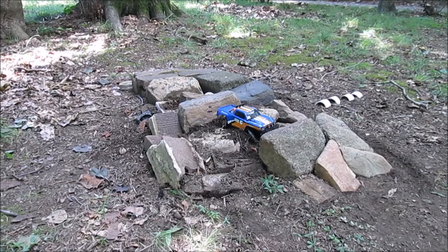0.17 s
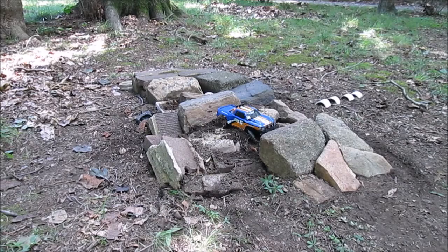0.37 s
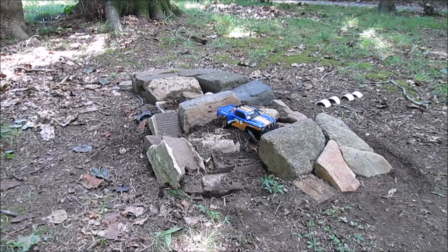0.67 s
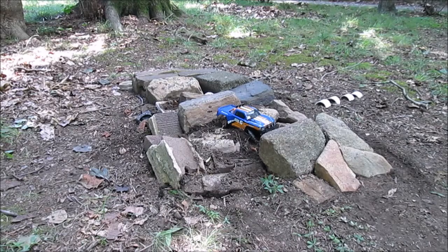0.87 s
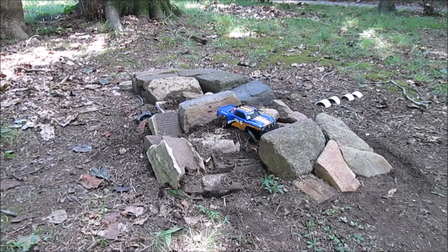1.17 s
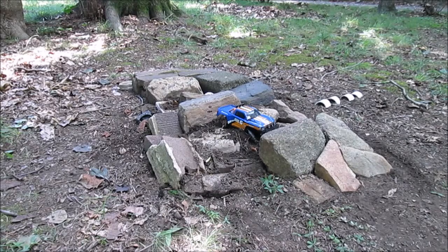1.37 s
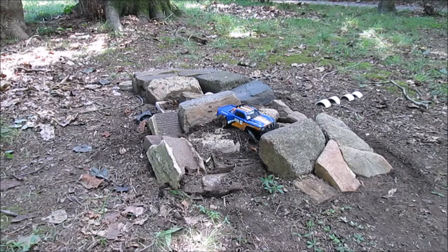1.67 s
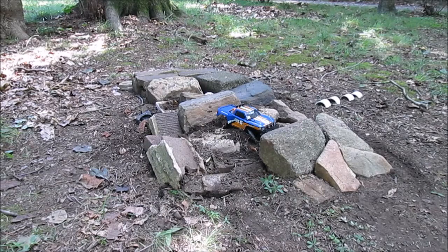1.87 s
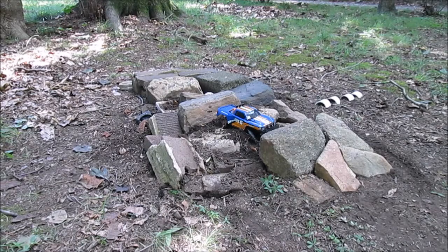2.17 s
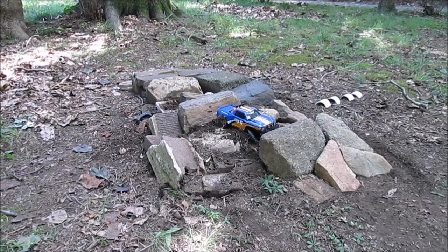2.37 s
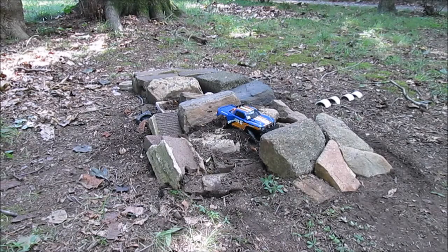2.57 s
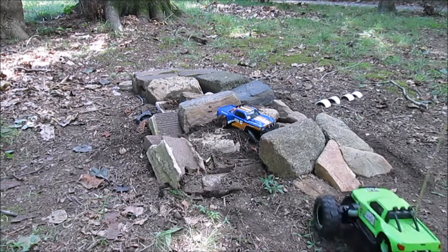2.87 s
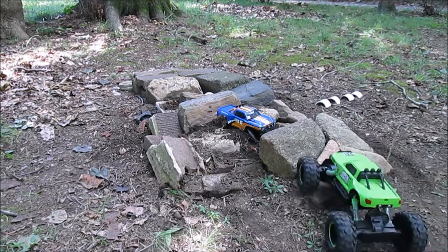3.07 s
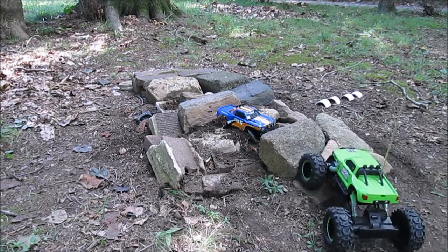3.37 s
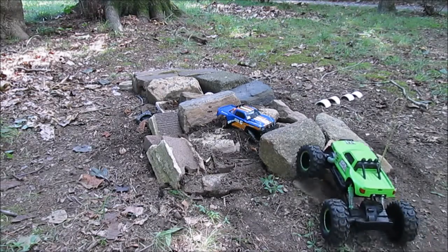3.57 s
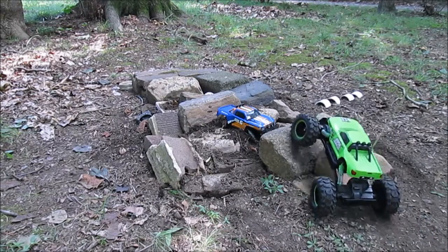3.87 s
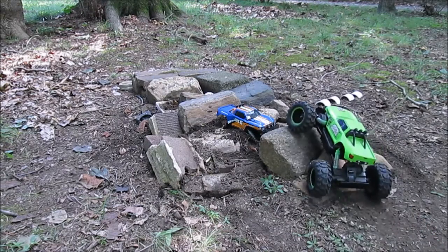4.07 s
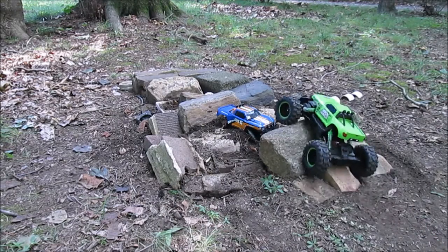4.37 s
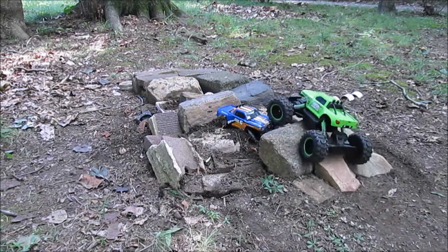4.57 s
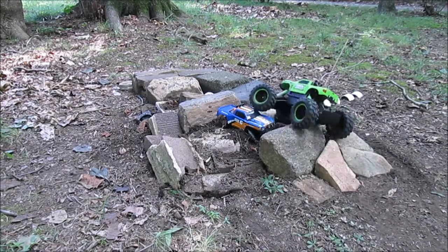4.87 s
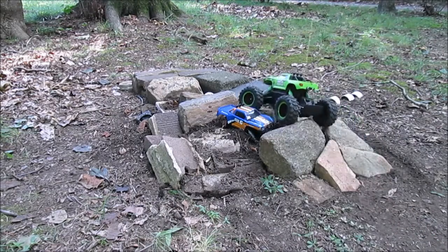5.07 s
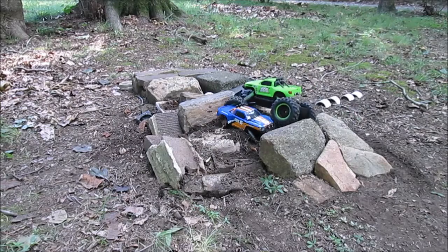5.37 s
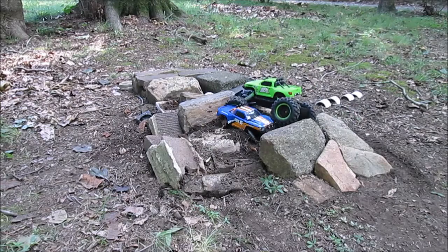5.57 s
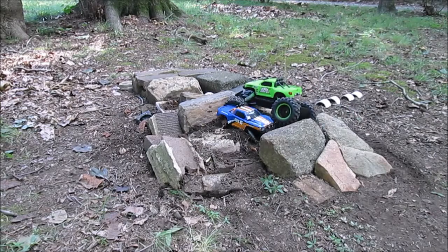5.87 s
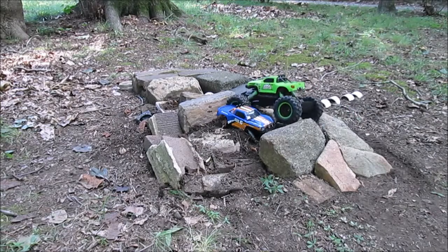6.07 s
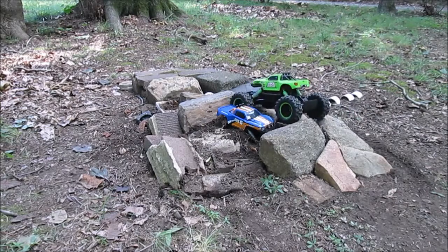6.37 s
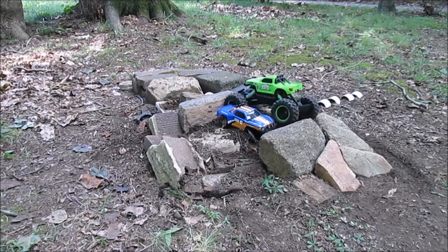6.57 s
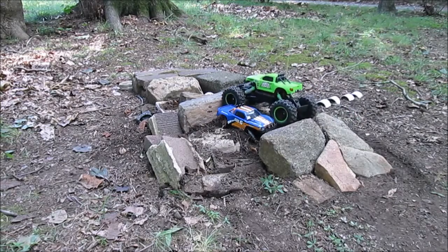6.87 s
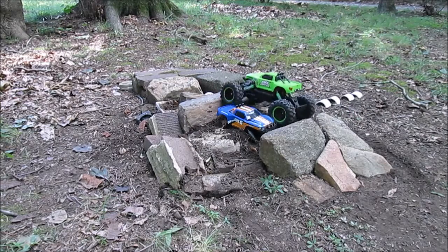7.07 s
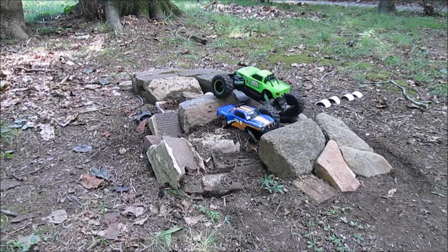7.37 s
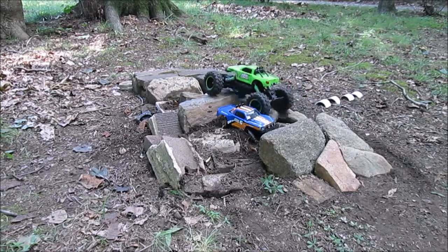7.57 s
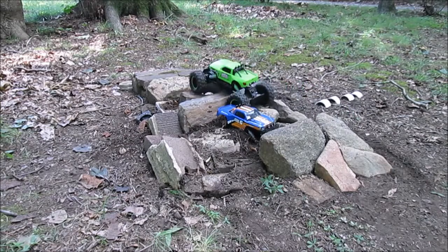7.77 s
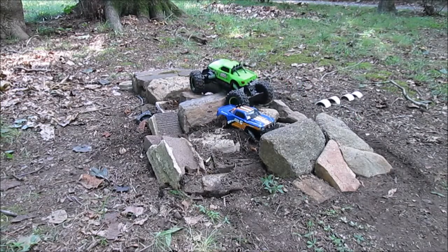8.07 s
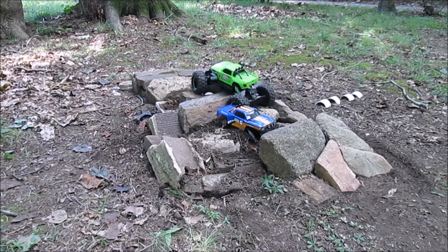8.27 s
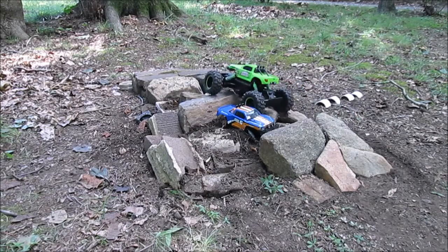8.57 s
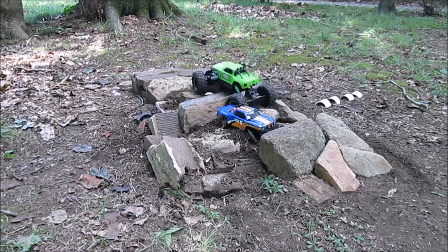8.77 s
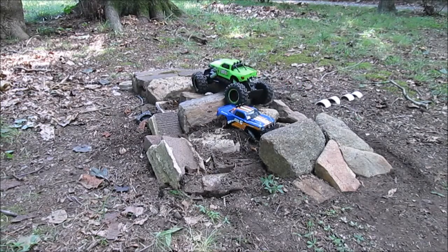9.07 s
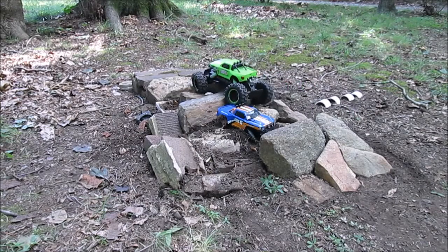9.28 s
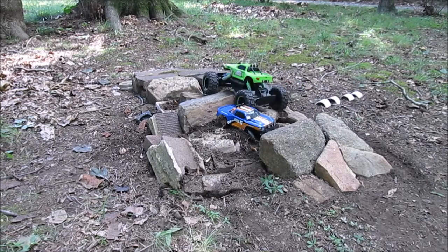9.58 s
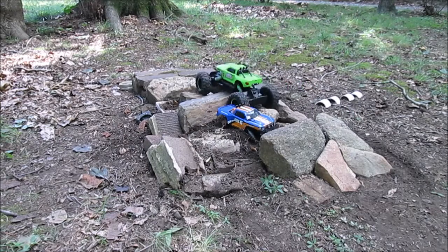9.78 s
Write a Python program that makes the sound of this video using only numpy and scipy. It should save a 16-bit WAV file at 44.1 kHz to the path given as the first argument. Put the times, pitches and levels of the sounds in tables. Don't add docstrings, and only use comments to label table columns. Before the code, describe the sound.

A plastic remote-control crawler starts at once in a rough grinding run with scuffs and lurches, cruises with a wavering motor whine, then labours up stones. Later it only works in short rasping bursts, separated by gaps with clicks, scrapes and small thuds. Quiet far traffic hum and faint insects sit behind, dipping while the motors run. Open woodland, fixed microphone a short way off, nearly mono.

```python
import sys
import numpy as np
from scipy import signal
from scipy.fft import rfft, irfft, next_fast_len
from scipy.io import wavfile
from scipy.ndimage import uniform_filter1d, map_coordinates

SR = 44100
rng = np.random.default_rng(int(sys.argv[2]) if len(sys.argv) > 2 else 0)


def boost(x):
    u = np.asarray(x, float) / 20
    return 10 ** u


def dump(signal):
    limited = np.clip(np.atleast_2d(signal).T, -1, 1)
    pcm = np.round(limited * 32767).astype(np.int16)
    wavfile.write(sys.argv[1], SR, pcm)


N = 437913


def unit(x):
    return x / np.sqrt(np.mean(x ** 2) + 1e-20)


def along(points, hz):
    f, v = np.transpose(points)
    return np.interp(np.log(hz + 1), np.log(f + 1), v)


def curves(rows, fade_s=0.013):
    s, *columns = np.transpose(rows)
    first = max(round((s[0] - fade_s) * SR), 0)
    last = min(round((s[-1] + fade_s) * SR), N)
    at = np.arange(first, last)
    t = at / SR
    gate = np.clip(np.minimum(t - s[0], s[-1] - t) / fade_s + 1, 0, 1)
    return [at] + [np.interp(t, s, column) for column in columns] + [gate]


def wobble(rate_hz):
    coarse = np.arange(0, N + 8, 8)
    knots = rng.standard_normal(int(N * rate_hz / SR) + 4)
    return np.interp(np.arange(N), coarse, map_coordinates(knots, [coarse * rate_hz / SR]))


def filtered(x, response):
    m = next_fast_len(x.shape[-1] + 8192)
    return irfft(rfft(x, m) * response(np.fft.rfftfreq(m, 1 / SR)), m)[..., :x.shape[-1]]


def modes(rows):
    def response(f):
        return sum((-1) ** k * boost(db) * 1j * f * width / (hz * hz - f * f + 1j * f * width)
                   for k, (hz, width, db) in enumerate(rows))
    return response


def coloured(spectrum):
    return unit(filtered(rng.standard_normal(N), lambda hz: boost(along(spectrum, hz))))


def narrow(bands, rate_hz):
    out = np.zeros(N)
    for hz, width, db in bands:
        swell = boost(db + 3 * wobble(rate_hz))
        out += swell * unit(filtered(rng.standard_normal(N), lambda f: modes([(hz, width, 0)])(f) ** 2))
    return out


def grind():
    # start in seconds, length in seconds, grind at start in dB, at end in dB.
    runs = [(0.0, 0.55, -22.5, -23), (0.57, 0.15, -28.5, -29.5), (0.714, 0.47, -24, -27.5),
            (1.385, 0.11, -29, -30.5), (1.537, 0.358, -27.5, -23), (1.934, 1, -22.5, -23.5),
            (3.003, 0.17, -26, -31), (3.241, 0.08, -25, -28.0), (3.501, 0.25, -28.5, -26),
            (3.805, 0.56, -29, -23), (4.486, 0.176, -31, -31.5), (4.693, 0.31, -25, -28),
            (5.097, 0.18, -27.5, -23.5), (5.327, 0.065, -30.5, -32.5), (5.609, 0.13, -58, -34),
            (5.964, 0.201, -31, -29), (6.379, 0.025, -37, -32), (6.405, 0.18, -31.5, -33),
            (6.86, 0.015, -35, -38), (7.02, 0.015, -43, -44), (7.16, 0.049, -33.5, -35.5),
            (7.288, 0.16, -32.5, -31), (7.522, 0.28, -28.5, -22.5), (8.244, 0.036, -35, -28),
            (8.362, 0.04, -26, -29.5), (8.547, 0.066, -31.5, -31), (8.657, 0.096, -27, -22.5),
            (8.883, 0.072, -35.5, -36.5), (9.368, 0.087, -36, -27.5), (9.486, 0.022, -38, -36.5),
            (9.664, 0.071, -41, -23), (9.777, 0.056, -34.5, -32)]
    # time in seconds, peak in dB.
    lurches = [(0.265, -32), (0.34, -19.5), (0.445, -21), (0.525, -19), (0.627, -20.5), (0.735, -23.5),
               (0.795, -24), (0.871, -17.5), (0.95, -21.5), (1.04, -21), (1.095, -21), (1.155, -24),
               (1.297, -21), (2.031, -19), (2.375, -24), (3.058, -23), (4.37, -31.5), (4.425, -23.5),
               (4.545, -29), (4.715, -27), (4.82, -22), (4.94, -28), (5.035, -24), (5.12, -27), (5.42, -32),
               (5.46, -33.5), (5.518, -37), (5.612, -35), (5.676, -28), (5.98, -23.5), (6.171, -28),
               (6.409, -19), (6.515, -29.5), (6.546, -36), (6.572, -36), (7.098, -25), (7.234, -26.5),
               (7.337, -22), (7.418, -28.5), (7.805, -27), (8.025, -37.5), (8.287, -22.5), (8.387, -30),
               (8.825, -33), (8.9, -33), (8.965, -32.5), (9.398, -21.5), (9.47, -24.5), (9.636, -22),
               (9.695, -28), (9.722, -25), (9.865, -28.5)]
    rest_db, bite_db_per_s, coast_db_per_s = -51, 697, 186
    linger_s, cut_s, cut_db = 0.017, 0.012, 6
    lurch_rise_db_per_s, lurch_fall_db_per_s = 750, 447
    t = np.arange(0, N + 64, 64) / SR
    power = boost(2 * rest_db)
    for s, length, start_db, end_db in runs:
        end = s + length + linger_s
        after_cut_db = end_db - cut_db
        levels_db = [start_db - bite_db_per_s, start_db, end_db, after_cut_db, after_cut_db - coast_db_per_s]
        power = power + boost(2 * np.interp(t, [s - 1, s, end, end + cut_s, end + 1], levels_db))
    for s, db in lurches:
        power = power + boost(2 * (db - np.maximum(lurch_fall_db_per_s * (t - s), lurch_rise_db_per_s * (s - t))))
    return np.interp(np.arange(N) / SR, t, 10 * np.log10(power))


def wood():
    # time in seconds, hum in dB.
    traffic = [(0, -39.5), (1.2, -38), (1.6, -45.5), (2.9, -41), (3.4, -39), (4.6, -39), (5.3, -36.5),
               (5.6, -41.5), (6.3, -37.5), (6.6, -41.5), (7.4, -39.5), (8.6, -40.5), (8.9, -46), (9.1, -44),
               (9.35, -39), (9.6, -45.5), (9.93, -43)]
    # frequency in Hz, level in dB per Hz.
    hum_spectrum = [(12, -34), (20, -28), (43, -20), (149, -3), (600, -13), (780, -53), (1320, -120)]
    air_spectrum = [(240, 1.5), (400, 3.5), (578, -17), (673, 0), (861, 0.5), (1030, -2.5), (1910, -7),
                    (3210, -7.5), (9540, -33), (15600, -33.5)]
    # frequency in Hz, width in Hz, level in dB re hum.
    drones = [(58, 20, -14), (110, 30, -10), (161, 6, -10), (209, 16, -14)]
    insects = [(2650, 90, -18), (3330, 90, -16)]
    duck_from_db, duck_share, duck_s = -32.5, 0.44, 0.18
    over_db = np.maximum(grind() - duck_from_db, 0)
    duck_db = duck_share * filtered(over_db, lambda hz: 1 / (1 + 2j * np.pi * hz * duck_s))
    hum = coloured(hum_spectrum) * boost(-2.5 + 0.9 * wobble(3.34))
    air = coloured(air_spectrum) * boost(-2.5 + 0.33 * wobble(1.65))
    return boost(curves(traffic)[1] - duck_db) * (hum + air + narrow(drones, 3) + narrow(insects, 4.3))


def bumps():
    # time in seconds, peak in dB, ring in Hz.
    scuffs = [(0.309, -19, 2860), (0.618, -16.5, 2530), (0.836, -15, 2650), (1.069, -17.5, 4430),
              (1.148, -15, 2560), (1.267, -20, 2740), (1.424, -14.5, 3270), (1.477, -28, 2400),
              (3.496, -23, 1750), (4.422, -18, 2860), (5.968, -22, 3820), (6.051, -21.5, 3120),
              (6.175, -21, 2960), (6.483, -13.5, 3460), (6.817, -13.5, 1070), (6.922, -31, 980),
              (7.277, -25, 3280), (7.923, -31, 2640), (8.197, -24.5, 1530), (8.279, -22, 3700),
              (8.352, -22, 3010), (8.818, -20, 3600), (9.226, -30.5, 1110), (9.293, -26, 1160)]
    clicks = [(2.99, -19, 3000), (3.214, -21, 4000), (3.465, -27.5, 1750), (5.574, -14.5, 2130),
              (5.731, -19.5, 3600), (5.283, -17, 2390), (9.874, -26, 1500), (9.26, -36, 900),
              (5.809, -34, 5100), (5.904, -33, 3580), (5.939, -26, 2910), (6.281, -27, 800),
              (6.301, -31, 1100), (6.301, -42, 4500), (6.328, -29.5, 1050), (6.47, -24, 3020),
              (6.606, -28, 3700), (6.807, -35, 6000), (6.964, -28.5, 6140), (6.985, -31, 5200),
              (8.073, -33, 800), (8.144, -38, 4800), (8.504, -29, 2670), (6.373, -29, 1580),
              (6.398, -17, 1370), (7.08, -20, 3700), (7.229, -15.5, 1580), (8, -26.5, 4695),
              (8.02, -22, 3500), (7.879, -25, 1100), (8.09, -35, 4500), (8.247, -17, 3100),
              (8.315, -28, 5600), (9.357, -26, 4200), (9.624, -24, 3100), (9.753, -28, 2200)]
    thuds = [(1.347, -29, 410), (4.267, -29, 576), (4.33, -25.5, 305), (5.283, -24.5, 386),
             (5.576, -29.5, 450), (6.481, -26, 436), (6.817, -23, 738), (7.712, -31, 368),
             (8.199, -34, 696), (8.772, -33, 384), (9.227, -35, 640), (9.75, -27, 305), (9.874, -28, 356)]
    # frequency in Hz, width in Hz, level in dB.
    panels = [(650, 500, -8.5), (1050, 450, 0), (1600, 550, -6.5), (2200, 640, -3), (3100, 740, 0), (4650, 810, -6)]
    focus_db_per_octave = 2.5
    out = np.zeros(N + SR)
    t = np.arange(SR // 10) / SR
    # snap in dB, length in seconds, rise in seconds
    contacts = [(*row, -30, 0.014, 0.0011) for row in scuffs] + [(*row, -8, 0.0063, 0.0003) for row in clicks]
    for s, db, hz, snap_db, length_s, rise_s in contacts:
        shape = (1 - np.exp(-t / rise_s)) * np.exp(-(t / length_s) ** 1.6)
        noise = rng.standard_normal((2, len(t)))
        struck = [(c, w, g - focus_db_per_octave * abs(np.log2(c / hz))) for c, w, g in panels]
        crunch = filtered(noise[0] * shape, modes([(hz, 480, 1)] + struck)) * boost(17.5)
        snap = filtered(noise[1] * shape ** 3, lambda f: modes([(6500, 3500, 0)])(f) ** 2) * boost(snap_db - 0.5)
        out[round(s * SR):][:len(t)] += boost(db - 10) * (crunch + snap)
    for s, db, hz in thuds:
        ring = np.sin(2 * np.pi * hz * t) + 0.5 * np.sin(2 * np.pi * 1.74 * hz * t + 1)
        envelope = boost(db + 8.5 - 60 * t / 0.03) * (1 - np.exp(-t / 0.00082))
        out[round(s * SR):][:len(t)] += envelope * ring
    return filtered(out[:N], lambda f: 1 / (1 + (f / 9000) ** 4))


def notes():
    # start in seconds, length in seconds, mesh in Hz, fundamental in dB, multiples in dB.
    singing = [(3.25, 0.097, 1766, -32.5, -45), (4.642, 0.02, 1590, -32, -44), (4.7, 0.02, 1180, -34, -44),
               (5.11, 0.019, 1450, -32, -40), (5.16, 0.038, 1360, -32.5, -37), (7.38, .065, 1345, -34, -41),
               (6.405, 0.039, 1325, -35, -37), (6.52, 0.053, 1413, -44, -45), (7.28, .07, 1600, -43, -31.5),
               (8.6, 0.17, 1460, -50, -34), (8.6, 0.083, 4780, -35.5, -80), (9.68, 0.082, 1513, -41, -32)]
    # time in seconds, mesh in Hz, fundamental in dB.
    glides = [
        [(1.53, 660, -46), (1.555, 705, -35), (1.6, 730, -35), (1.63, 790, -44), (1.7, 970, -40),
         (1.77, 1130, -36), (1.85, 1190, -39)],
        [(3.63, 900, -40), (3.69, 1090, -29), (3.74, 1210, -30), (3.8, 1190, -33), (3.9, 1060, -36),
         (3.96, 1180, -44), (4.07, 1180, -42), (4.11, 1210, -33), (4.17, 1200, -39)],
        [(3.5, 1500, -40), (3.56, 1750, -33), (3.63, 1920, -32), (3.76, 1950, -37)],
        [(3.55, 1230, -42), (3.61, 1380, -34), (3.68, 1760, -35), (3.75, 1720, -38)],
        [(3.81, 1620, -40), (3.9, 1580, -37), (3.96, 1330, -34), (3.995, 1520, -30), (4.02, 1300, -34),
         (4.05, 1030, -33)],
        [(7.55, 1360, -44), (7.6, 1260, -36), (7.645, 1330, -38), (7.69, 1520, -42), (7.72, 1510, -46)],
        [(4.77, 1380, -42), (4.81, 1470, -33), (4.87, 1500, -36), (4.95, 1420, -34), (5.02, 1480, -34),
         (5.06, 1500, -42)],
    ]
    cruise = [(1.83, 1171, -42), (1.96, 1224, -36), (2.02, 1329, -31), (2.07, 1301, -31.5),
              (2.14, 1199, -37), (2.19, 1430, -30.5), (2.25, 1330, -34), (2.29, 1342, -23.5),
              (2.33, 1273, -29), (2.4, 1330, -26), (2.44, 1250, -44), (2.5, 1402, -24), (2.57, 1199, -33),
              (2.62, 1390, -27), (2.7, 1318, -28), (2.79, 1277, -30.5), (2.88, 1443, -31),
              (2.95, 1430, -31)]
    multiples_db = [-33, -35, -34.5, -44, -44, -27, -37, -31]
    swell_s, swell_db = 0.025, -19
    out = []
    for s, length, hz, first_db, upper_db in singing:
        shape = [(-swell_s, swell_db), (0, 0), (length, 0), (length + swell_s, swell_db)]
        out.append([(s + u, hz, first_db + g, upper_db + g) for u, g in shape])
    for rows, upper_db in zip([*glides, cruise], multiples_db):
        out.append([(*row, upper_db) for row in rows])
    return out


def whine():
    def shell(hz):
        body = modes([(2850, 900, 0), (3650, 500, -4), (4850, 500, -11), (5950, 600, -13)])
        return abs(body(hz)) / (1 + (hz / 7000) ** 8)

    out = np.zeros(N)
    for speed_ratio, motor_db in [(1, 4), (0.91, -5)]:
        unrest = 0.03 * wobble(45) + 0.018 * wobble(350)
        flutter_db = 2.2 * wobble(40)
        for rows in notes():
            at, hz, first_db, upper_db, gate = curves(rows)
            speed = speed_ratio + unrest[at] * np.minimum(hz / 1350, 1) ** 0.9
            phase = 2 * np.pi * np.cumsum(hz * speed) / SR
            beat = 1 + 0.45 * np.cos(phase / 8)
            upper = np.zeros(len(at))
            for k in range(2, 9):
                own_flutter = boost(1.2 * flutter_db[at - 3000 * k])
                upper += shell(k * hz) * own_flutter * np.sin(k * phase)
            upper /= shell(2 * hz) + 0.3
            tone = boost(first_db) * np.sin(phase) + boost(upper_db - 2.0) * upper
            out[at] += gate * beat * boost(motor_db + flutter_db[at]) * tone
    return out


def knocks():
    # start in seconds, length in seconds, knocks per second at start, at end,
    # share of the grind from 0 to 1.
    spells = [(0, .25, 102, 156, .72), (.27, .9, 165, 190, .42), (1.42, .08, 95, 92, .8),
              (2.985, .15, 128, 98, .68), (3.222, .145, 112, 88, .8), (3.455, .3, 41, 67, .62),
              (3.8, .27, 62, 50, .28), (4.54, .12, 46, 46, .25), (6.02, .18, 102, 78, .75),
              (8.34, .08, 140, 130, .4), (9.48, .06, 125, 110, .5), (6.46, .15, 120, 90, .35),
              (8.64, .14, 150, 175, .3), (9.37, .1, 130, 150, .3), (9.63, .24, 140, 160, .3),
              (4.76, .28, 150, 165, .25)]
    belly_levels_db = [-2.5, -1, -20, -7.5, 4, -3, -10, -4, -6, -4, 3, -12, -11, -8, -8, -10]
    # frequency in Hz, width in Hz, level in dB.
    case = [(2820, 520, 0), (4700, 700, -5)]
    belly = [(870, 430, -5), (1704, 420, -3.5)]
    hits, slack, tub = np.zeros((3, N))
    uneven = wobble(150)
    for (s, length, first, last, part), belly_db in zip(spells, belly_levels_db):
        at, rate, share, gate = curves([(s, first, part), (s + length, last, part)])
        turns = np.cumsum(rate * (1 + 0.05 * uneven[at])) / SR + 0.65
        size = boost(1.3 * rng.standard_normal(len(at))) / np.sqrt(rate)
        hits[at] = np.diff(np.floor(turns), prepend=0) * size
        tub[at] = boost(belly_db)
        slack[at] = 0.95 * gate * np.clip(share, 0, 1)

    def rung(body):
        return lambda hz: sum(modes([mode])(hz) ** 2 for mode in body)

    ring = filtered(hits / np.sqrt(tub + 1), rung(case)) + filtered(hits * tub, rung(belly))
    return ring / np.sqrt(np.sum(ring ** 2) / np.sum(slack > 0)), slack


def patchy(x, depth_db):
    z = signal.stft(x, nperseg=256)[2]
    field = uniform_filter1d(rng.standard_normal(z.shape), size=3, axis=0)
    field = uniform_filter1d(field, size=20, axis=1)
    return unit(signal.istft(z * boost(depth_db * unit(field)), nperseg=256)[1][:N])


def teeth():
    # mesh in Hz, level in dB.
    stages = [(520, -20), (1180, -16), (1620, -19)]
    contact = rng.standard_normal(N) * boost(2.3 * wobble(600))
    for hz, db in stages:
        speed = 1 + 0.07 * wobble(9) + 0.04 * wobble(45) + 0.03 * wobble(400)
        phase = 2 * np.pi * np.cumsum(hz * speed) / SR
        comb = sum(np.cos(k * phase) for k in range(1, 5))
        contact += comb * boost(db + 2.5 * wobble(45))
    return patchy(contact * boost(1.5 * wobble(110) + 0.4 * wobble(22)), depth_db=1.6)


def gearbox():
    # time in seconds, facing in dB, shell resonance in Hz.
    turning = [(0, -17, 2810), (1.19, -15.5, 2620), (1.4, -7, 2830), (1.8, -9.5, 2690), (2.15, -17, 2740),
               (2.71, -13, 2610), (2.93, -15.5, 2844), (3.3, -10.5, 2820), (3.5, -14, 2900),
               (3.75, -10.5, 2920), (4.7, -10, 2960), (5.6, -6.5, 3270), (6.19, -18, 2700), (6.6, -7, 3340),
               (6.85, -6.5, 2600), (7.3, -10, 3160), (7.82, -9.5, 3100), (8.1, -9.5, 2780), (9, -11, 2950),
               (9.93, -7, 3100)]
    # frequency in Hz, width in Hz, level in dB.
    shell_modes = [(658, 460, -12), (927, 936, -9.5), (1330, 373, -6.5), (1750, 760, -11),
                   (3645, 600, -9.5), (5150, 610, -16.5), (6340, 90, -62)]
    # frequency in Hz, level in dB per Hz.
    hiss_spectrum = [(3240, -11.5), (5500, -0.5), (5900, -2), (6810, -6), (9520, -22), (11200, -18),
                     (15600, -49)]
    grind_db = grind()
    _, facing_db, shell_hz, _ = curves(turning)
    hollow_db = 2 + 0.28 * facing_db + 0.29 * (-33 - grind_db)
    force = teeth()
    ring, slack = knocks()

    stops_hz = [2300, 2650, 3000, 3400]
    place = np.interp(shell_hz, stops_hz, range(len(stops_hz)))
    main = np.zeros(N)
    for k, hz in enumerate(stops_hz):
        main += np.clip(1 - abs(place - k), 0, 1) * filtered(force, modes([(hz, 360, 0)]))
    upper = unit(main + boost(0.29 * wobble(17)) * filtered(force, modes(shell_modes[4:])))
    upper = filtered(upper, lambda hz: 1 / (1 + (1500 / (hz + 1)) ** 6) / (1 + (hz / 7000) ** 6))
    upper = np.sqrt(1 - slack) * upper + np.sqrt(slack) * ring

    def hollow_body(hz):
        return modes(shell_modes[:4])(hz) / (1 + (450 / (hz + 1)) ** 4) / (1 + (hz / 2300) ** 6)

    hollow = unit(filtered(force, hollow_body))
    sparks = force * (1 + 0.064 * np.sqrt(slack) * abs(ring)) * boost(0.44 * wobble(19))
    hiss = unit(filtered(sparks, lambda hz: boost(along(hiss_spectrum, hz))))
    hollow_gain = boost(hollow_db - 0.74 + 1.1 * wobble(14))
    return boost(grind_db - 1.71) * (upper + hollow_gain * hollow + boost(facing_db + 4.5) * hiss)


def scene():
    # frequency in Hz, level in dB.
    apart = [(1000, -47.5), (2800, -28.5), (5600, -16), (10000, -15), (14000, -7)]
    mid = wood() + bumps() + whine() + gearbox()
    side = filtered(mid * wobble(150), lambda hz: boost(along(apart, hz)))
    return np.array([mid + side, mid - side])


def low_pass(x):
    return signal.sosfilt(signal.butter(12, 15730, fs=SR, output="sos"), x)


def record(dry):
    held = dry / (1 + abs(dry / 0.4) ** 4) ** (1 / 4)
    mix = filtered(held, lambda hz: hz < 15730) + 0.0016
    return low_pass(mix)


dry = scene()
out = record(dry)
dump(out)
```